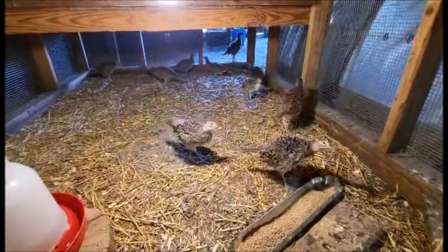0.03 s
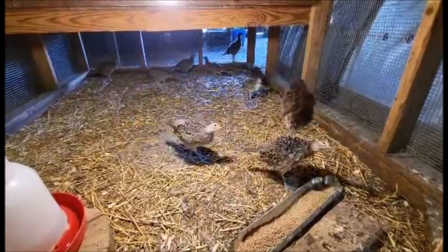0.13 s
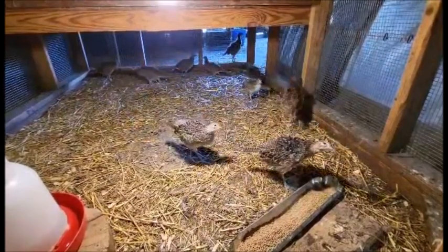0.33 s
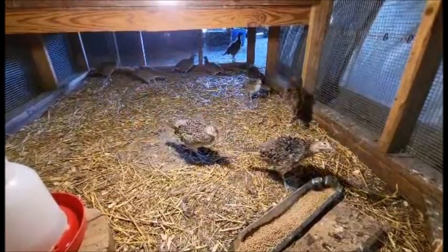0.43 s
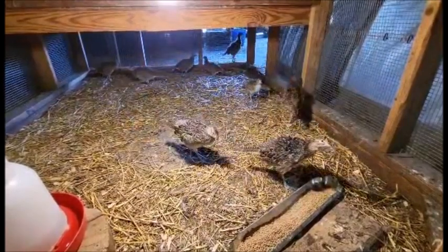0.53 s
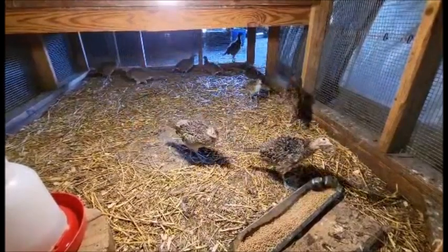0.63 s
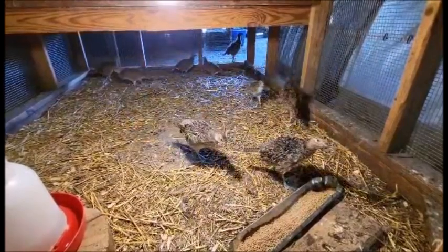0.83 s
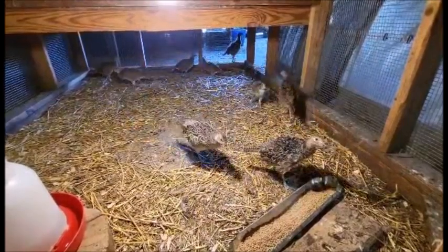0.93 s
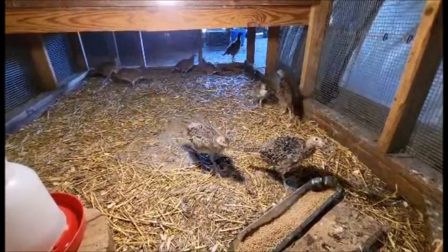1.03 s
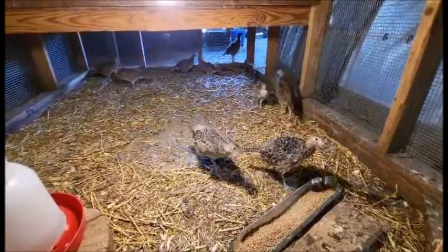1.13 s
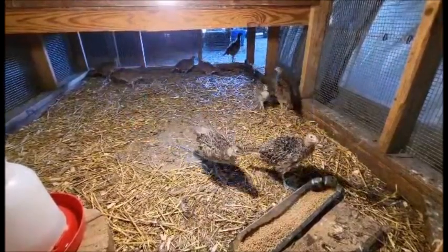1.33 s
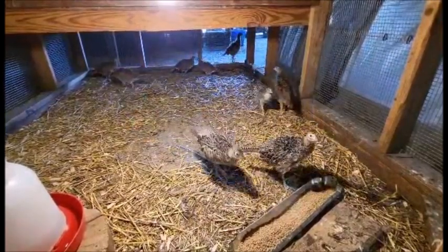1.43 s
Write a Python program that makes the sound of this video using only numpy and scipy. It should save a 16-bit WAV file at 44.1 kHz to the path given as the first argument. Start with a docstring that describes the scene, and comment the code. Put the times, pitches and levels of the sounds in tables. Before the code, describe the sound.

Dry straw rustles and crackles in short scuffs as young pheasants step about a small wooden pen, with the sharpest snaps at the start and near 1.15 seconds. Soft peeps and clucks come around 0.25, 0.7 and 1.2 seconds. A dull thump sounds on the frame at 0.4 seconds, with softer bumps around it. Faint flock twitter and a low handling rumble come and go over steady air.

```python
"""Dry straw crackles, hisses and snaps under young pheasants stepping about a small wooden pen.
Each brittle fracture excites a brief resonance, and a claw draws a stick-slip tone from one stalk.
The birds give soft clucks and peeps, gliding whistles, over the faint twitter of the flock behind.
A dull thump and a few softer bumps ring the damped modes of the pen's frame,
and a low rumble of handling comes and goes over the steady noise of the air."""
import sys
import numpy as np
from scipy import signal
from scipy.fft import rfft, irfft, next_fast_len
from scipy.io import wavfile
from scipy.ndimage import uniform_filter1d, map_coordinates

SR = 44100
rng = np.random.default_rng(int(sys.argv[2]) if len(sys.argv) > 2 else 0)


def master(y):
    """Save y as 16-bit WAV."""
    cut = np.clip(np.atleast_2d(y).T, -1, 1)
    pcm = np.round(cut * 32767)  # scale
    wavfile.write(sys.argv[1], SR, pcm.astype(np.int16))


N = 66150

# Feet scuffing the straw: t/s, decay time/s, relative level/dB
SCUFFS = [(.0, 0.035, -63), (0.032, 0.025, -58.5), (0.08, 0.067, -65), (0.193, 0.06, -65),
          (0.219, 0.093, -63), (0.372, 0.051, -68.5), (0.396, 0.056, -62.5), (0.448, 0.075, -71),
          (0.608, 0.23, -68.5), (0.788, 0.057, -63.5), (0.909, 0.066, -68), (1.001, 0.089, -65.5),
          (1.115, 0.057, -64), (1.15, 0.043, -61), (1.231, 0.051, -69.5), (1.38, 0.047, -72.5),
          (1.411, 0.32, -67.5)]
# Breaking stalks: t/s, level before colouring/dB, ring f/Hz
SNAPS = [(0.0374, -43.5, 7780), (0.0904, -45, 8640), (0.098, -51, 6400), (.2345, -53, 5630),
         (0.376, -53, 6200), (0.804, -50.5, 5270), (0.928, -47, 7140), (1.0246, -49.5, 5540),
         (1.0656, -47.5, 4860), (1.1494, -39.5, 5100), (1.170, -44, 5930), (1.4277, -53, 6560)]
# Claw on a stalk: t/s, decay time/s (sign has no effect), f/Hz, level before colouring/dB
SCRAPE = (.473, -0.0348, 5295, -54)
# Response of the straw, left and right: f/Hz, gain/dB
STRAW_LEFT = [(500, -16), (2300, -13.5), (3300, -12), (4700, -1.5), (6300, -4.5), (8200, -3),
              (10000, -10.5), (13000, -4.5)]
STRAW_RIGHT = [(500, -7), (2300, -8.5), (3300, -17.5), (4400, -3.5), (5400, 1.5), (7600, -2), (9400, -26),
               (13000, -17)]
# Clucks and peeps: t/s, duration/s, first f/Hz, last f/Hz, level/dB, roughness (0-1)
NOTES = [(0.062, 0.019, 1436, 1457, -64.5, 0.2), (0.066, 0.043, 1789, 1969, -57, 0.67),
         (0.224, 0.029, 2108, 2034, -62, 0.04), (0.247, 0.016, 2130, 1800, -50, 0.1),
         (0.260, 0.017, 1796, 2035, -52, 0.1), (0.265, 0.034, 1488, 1546, -52.5, 0.01),
         (0.268, 0.0338, 1788, 2253, -55.5, 0.76), (0.688, 0.056, 1493, 1407, -62, 0.46),
         (0.727, 0.02, 1070, 930, -61.5, 0.36), (0.984, 0.04, 1081, 1110, -62.5, 0.04),
         (1.153, 0.046, 1447, 1430, -66.5, 0.25), (1.152, 0.0457, 1978, 2240, -57.5, .95),
         (1.222, 0.045, 1274, 1254, -51, 0.02), (1.256, 0.026, 1206, 1212, -51.5, 0.01)]
# Blows on the frame: t/s, relative level/dB
THUMPS = [(0.095, -55.5), (0.262, -55), (0.414, -35), (.655, -48.5), (0.733, -57), (0.993, -67)]
# Modes of the frame: f/Hz, relative level/dB, T60/s
FRAME_MODES = [(85.5, 3.5, 0.48), (131.1, -11.5, 0.48), (228.8, -17.5, 0.26), (321.3, -22.5, 0.27)]
# Noise of a blow: f/Hz, relative level/dB
KNOCK_SPECTRUM = [(100, -49), (350, 12), (600, 5), (1000, 0), (3000, -14.5)]
# Swells of the rumble: centre t/s, half-width/s, level/dB
RUMBLE_SWELLS = [(.01, 0.039, -54.5), (.12, 0.018, -58), (.255, 0.03, -51), (.44, 0.024, -44.5),
                 (.70, 0.081, -50.5), (.915, 0.022, -58.5), (1.115, 0.0088, -56.5), (1.195, 0.019, -45.5),
                 (1.32, 0.031, -54.5), (1.48, 0.021, -54.5)]
# Murmur above the rumble: t/s, level/dB
MURMUR_LEVEL = [(0.0, -68.5), (0.756, -71.5), (0.952, -82.5), (1.17, -67.5), (1.5, -80)]
# Its spectrum: f/Hz, relative level/dB
MURMUR_SPECTRUM = [(60, -30.5), (170, -1.5), (260, -2.5), (330, 2.5), (480, -25), (1000, -20), (2500, -34)]
# Twitter of the far flock: t/s, level/dB
FLOCK_LEVEL = [(0.0, -76), (0.36, -69.5), (0.87, -96), (1.018, -75), (1.16, -65), (1.5, -77)]
# Its spectrum: f/Hz, relative level/dB
FLOCK_SPECTRUM = [(1250, -6.5), (1600, 7), (1950, 9), (2250, -1), (2700, -4), (3500, -28)]
# Still air: f/Hz, relative level/dB
AIR_SPECTRUM = [(20, -44), (60, 10), (330, -18), (800, -27.5), (2500, -26), (3300, -30.5), (13000, -49)]
# Likeness of noise at left and right: f/Hz, coherence (0-1)
COHERENCE = [(500, 0.81), (1000, 0.0049)]
# Reverberation of the pen: f/Hz, T60/s
PEN_DECAY = [(200, 0.081), (1500, 0.36), (5000, 0.11), (12000, 0.014)]

STRAW_GAIN_DB, STRAW_REST_DB, STRAW_PATCHY_DB, HISS_DB, SCUFF_RISE_S = 0.5, -82, 2.3, 6.5, 0.007
CRACKLES_PER_S, CRACKLE_SPREAD_DB, CRACKLE_T60_S = 3200, 3.5, 0.012
CRACKLE_LOW_HZ, CRACKLE_HIGH_HZ = 3797, 12970
SNAP_T60_S, SNAP_ECHO_DB, SPLINTER_DB, SPLINTER_T60_S = 0.005, -14, -17, 0.06
STALK_RING_DB, STALK_T60_S = -3.5, 0.007
QUAVER_DEPTH, QUAVER_PER_S, RASP_PER_S, NOTE_EDGE_SHARE = 0.012, 130, 850, 0.3
CALL_ECHO_DB, HOARSE_ECHO_DB = -15, 10
THUMP_ATTACK_S, KNOCK_DB, KNOCK_T60_S = 0.0023, -26.5, 0.37
FRAME_SHARP_SHARE, FRAME_SETTLE_S, SHUDDER_DB, SHUDDER_PER_S = 0.199, 0.06, 1.7, 45
RUMBLE_HZ, RUMBLE_WANDER, RUMBLE_REST_DB = 48.5, 0.14, -72
FLOCK_PAN_DB, FLOCK_FLUTTER_DB, AIR_DB, TOP_HZ = 5, 3.4, -63, 13300


def rustle():
    """Fracture crackles and friction hisses underfoot; the scuffs are incoherent, so powers add."""
    t = np.arange(N) / SR
    power = np.full(N, amp(STRAW_REST_DB) ** 2)
    for start, decay, db in SCUFFS:
        add(power, start, amp(db) ** 2 * stroke(t, decay))
    stalks = crackles() + amp(HISS_DB) * rng.standard_normal((2, N))
    return amp(STRAW_GAIN_DB) * np.sqrt(power) * unit(straw_colour(patchy(stalks)))


def crackles():
    """Shot noise: tiny fractures at random times each excite a damped sinusoid of random pitch."""
    count, t = int(CRACKLES_PER_S * N / SR), np.arange(SR // 50) / SR
    when, pitch, size, left_phase, right_phase = rng.random((count, 5)).T[:, :, None]
    hz = CRACKLE_LOW_HZ + pitch * (CRACKLE_HIGH_HZ - CRACKLE_LOW_HZ)
    db = CRACKLE_SPREAD_DB * np.minimum(-np.log(1 - size), 3.5)  # many weak, few strong
    envelope = amp(db) * fade(t, CRACKLE_T60_S)
    samples = ((when * N).astype(int) + np.arange(len(t))).ravel()
    sides = [envelope * np.sin(2 * np.pi * (hz * t + phase)) for phase in (left_phase, right_phase)]
    return unit(np.array([np.bincount(samples, rings.ravel(), N)[:N] for rings in sides]))


def snaps():
    """Brittle fracture: a stalk breaks with a burst of noise, rings for an instant and splinters."""
    out, t = np.zeros((2, N)), np.arange(N) / SR
    for start, db, hz in SNAPS:
        envelope = fade(t, SNAP_T60_S) + amp(SPLINTER_DB) * fade(t, SPLINTER_T60_S)
        crack = envelope * rng.standard_normal((2, N))
        ring = amp(STALK_RING_DB) * fade(t, STALK_T60_S) * np.sin(2 * np.pi * hz * t)
        add(out, start, amp(db) * (crack + ring))
    return straw_colour(out + amp(SNAP_ECHO_DB) * pen_echo(out))


def scrape():
    """Stick-slip friction: a dragging claw randomly modulates the shrill tone of one stalk."""
    start, decay, hz, db = SCRAPE
    out, t = np.zeros((2, N)), np.arange(N) / SR
    slips = np.array([wobble(per_s=700), wobble(per_s=700)])
    add(out, start, amp(db) * np.sqrt(stroke(t, decay)) * slips * np.sin(2 * np.pi * hz * t))
    return straw_colour(out)


def stroke(t, decay):
    """Power envelope of a foot stroke: a quick rise, then a Gaussian decay."""
    return (1 - np.exp(-t / SCUFF_RISE_S)) * np.exp(-(t / decay) ** 2)


def patchy(x):
    """Spectral fluctuation: different stalks ring from moment to moment, shifting the colour."""
    spectra = signal.stft(x, nperseg=256)[2]
    patches = uniform_filter1d(rng.standard_normal(spectra.shape[1:]), size=3, axis=0)
    patches = uniform_filter1d(patches, size=12, axis=1)
    return signal.istft(spectra * amp(STRAW_PATCHY_DB * unit(patches)), nperseg=256)[1][:, :N]


def straw_colour(x):
    """The frequency response of dry stalks shapes the excitation, differently on each side."""
    return filtered(x, lambda hz: amp([along(STRAW_LEFT, hz), along(STRAW_RIGHT, hz)]))


def calls():
    """Gliding whistles: frequency modulation makes them quaver, noise modulation makes them hoarse."""
    out, t = np.zeros((2, N)), np.arange(N) / SR
    for start, length, first_hz, last_hz, db, rough in NOTES:
        glide = np.interp(t, [0, length], [first_hz, last_hz])
        hz = glide * (1 + QUAVER_DEPTH * wobble(QUAVER_PER_S))
        phase = 2 * np.pi * np.cumsum(hz) / SR
        ramp = np.clip(np.minimum(t, length - t) / (NOTE_EDGE_SHARE * length), 0, 1)
        rasp = wobble(RASP_PER_S) + 1j * wobble(RASP_PER_S)
        flutter = np.sqrt(1 - rough) + np.sqrt(rough / 2) * rasp
        note = amp(db) * np.sin(np.pi / 2 * ramp) * flutter * np.exp(1j * phase)
        direct = np.array([note.real, note.imag])  # off to one side: a quarter cycle apart
        echo = amp(CALL_ECHO_DB + HOARSE_ECHO_DB * rough) * pen_echo(note.real)
        add(out, start, direct + echo)  # clean peeps have less echo and sound nearer
    return out


def thumps():
    """Impacts excite the frame's damped modes, which start sharp, settle and shudder as they fade."""
    out, t = np.zeros((2, N)), np.arange(N) / SR
    warped_t = t + FRAME_SHARP_SHARE * FRAME_SETTLE_S * (1 - np.exp(-t / FRAME_SETTLE_S))
    ring = sum(amp(db) * fade(t, t60) * np.sin(2 * np.pi * hz * warped_t) for hz, db, t60 in FRAME_MODES)
    attack = 1 - np.exp(-t / THUMP_ATTACK_S)
    for start, db in THUMPS:
        knock = amp(KNOCK_DB) * fade(t, KNOCK_T60_S) * stereo_noise(KNOCK_SPECTRUM)
        shudder = amp(SHUDDER_DB * wobble(SHUDDER_PER_S))
        add(out, start, amp(db) * attack * (ring * shudder + knock))
    return out


def rumble():
    """Handling: a low tone under random frequency modulation swells and sinks below a dull murmur."""
    t = np.arange(N) / SR
    hz = RUMBLE_HZ * np.exp(RUMBLE_WANDER * wobble(per_s=45.08))
    tone = unit(np.sin(2 * np.pi * np.cumsum(hz) / SR))
    power = sum(amp(db) ** 2 * np.exp(-((t - centre) / width) ** 2) for centre, width, db in RUMBLE_SWELLS)
    murmur = level(MURMUR_LEVEL) * stereo_noise(MURMUR_SPECTRUM)
    return np.sqrt(amp(RUMBLE_REST_DB) ** 2 + power) * tone + murmur


def flock():
    """Superposition blurs the far birds into a narrow, fluttering band of noise."""
    pan = amp(np.array([[FLOCK_PAN_DB], [-FLOCK_PAN_DB]]) / 2)
    flutter = amp(FLOCK_FLUTTER_DB * wobble(per_s=60.08))
    return level(FLOCK_LEVEL) * pan * unit(flutter * stereo_noise(FLOCK_SPECTRUM))


def air():
    """Stationary background noise, strongest in the bass."""
    return amp(AIR_DB) * stereo_noise(AIR_SPECTRUM)


def pen_echo(x):
    """Reverberation: convolution with a noise tail for each side, its decay set by frequency."""
    hz, t, spectra = signal.stft(rng.standard_normal((2, SR // 2)), SR, nperseg=256)
    tail = signal.istft(spectra * fade(t, along(PEN_DECAY, hz)[:, None]), SR, nperseg=256)[1]
    return signal.fftconvolve(np.atleast_2d(x), tail / np.linalg.norm(tail[0]), axes=1)[:, :N]


def stereo_noise(spectrum):
    """Coloured noise of rms 1, coherent between the sides only at low frequencies."""
    def response(hz):
        angle = np.arccos(along(COHERENCE, hz)) / 2
        return amp(along(spectrum, hz)) * [np.cos(angle), np.sin(angle)]
    mid, side = filtered(rng.standard_normal((2, N)), response)
    return unit(np.array([mid + side, mid - side]))


def amp(db):
    """Decibels to amplitude ratio."""
    return 10 ** (np.asarray(db) / 20)


def unit(x):
    """Normalisation to rms 1."""
    return x / np.sqrt(np.mean(x ** 2) + 1e-20)


def along(points, hz):
    """Interpolation of (f/Hz, value) rows on a log frequency axis."""
    f, values = np.transpose(points)
    return np.interp(np.log(hz + 1), np.log(f + 1), values)


def level(rows):
    """Gain per sample from (t/s, level/dB) rows."""
    return amp(np.interp(np.arange(N) / SR, *np.transpose(rows)))


def wobble(per_s):
    """A smooth random curve with per_s knots a second."""
    return map_coordinates(rng.standard_normal(4096), [np.arange(N) * per_s / SR], mode="wrap")


def fade(t, t60):
    """Exponential decay, 60 dB in t60."""
    return amp(-60 * t / t60)


def filtered(x, response):
    """Linear filtering: the spectrum of x times a frequency response."""
    size = next_fast_len(N + SR // 2)
    return irfft(rfft(x, size) * response(np.fft.rfftfreq(size, 1 / SR)), size)[..., :N]


def add(track, start_s, sound):
    """Superposition of a delayed sound on a track."""
    i = max(round(start_s * SR), 0)
    track[..., i:] += sound[..., :N - i]


def scene():
    """Sound pressures add: straw and birds over the low sounds and the air of the pen."""
    low = (thumps() + rumble()) * amp([[0.7], [-0.7]])  # slightly to the left
    return calls() + flock() + rustle() + scrape() + snaps() + low + air()


def record(dry):
    """An ideal low-pass filter limits the bandwidth."""
    return filtered(dry, lambda hz: hz < TOP_HZ)


dry = scene()
out = record(dry)
master(out)
```